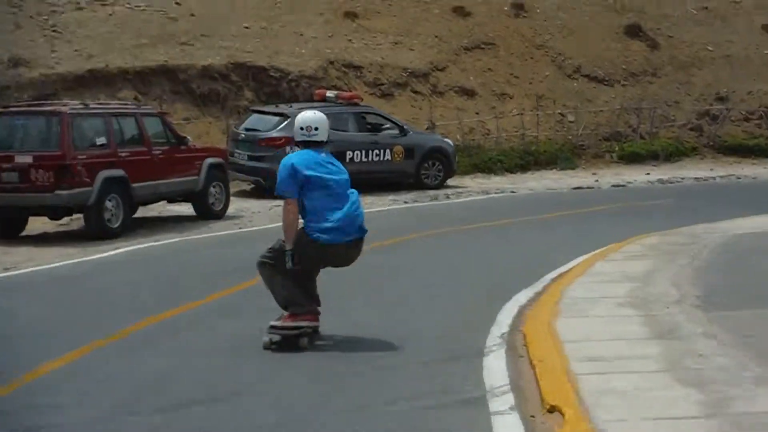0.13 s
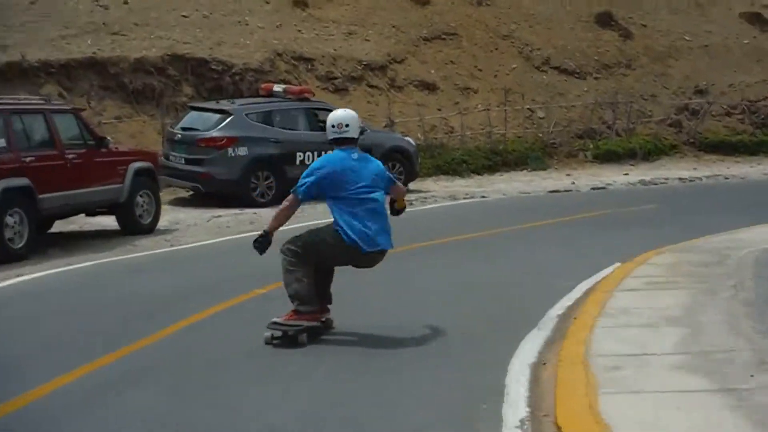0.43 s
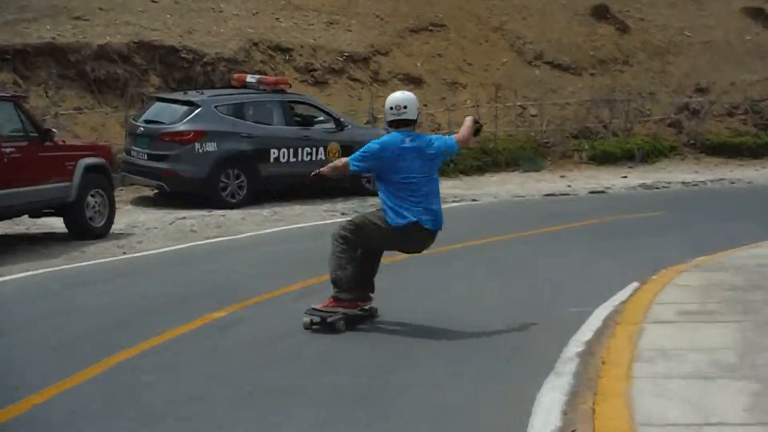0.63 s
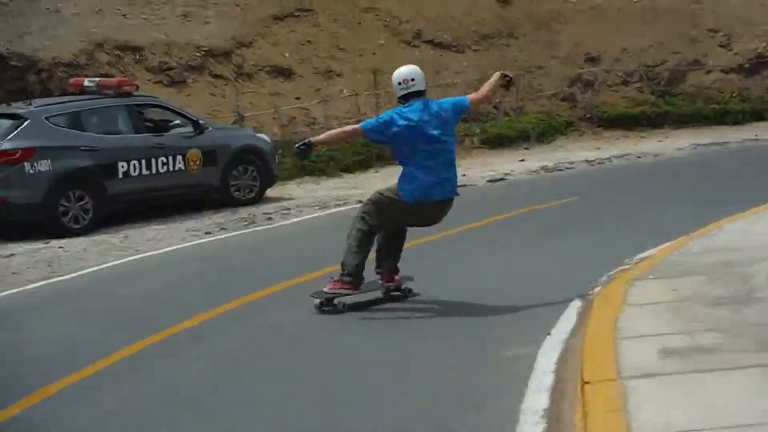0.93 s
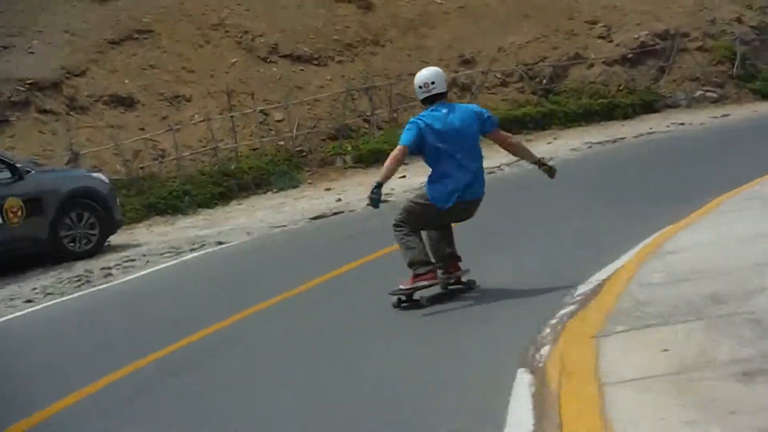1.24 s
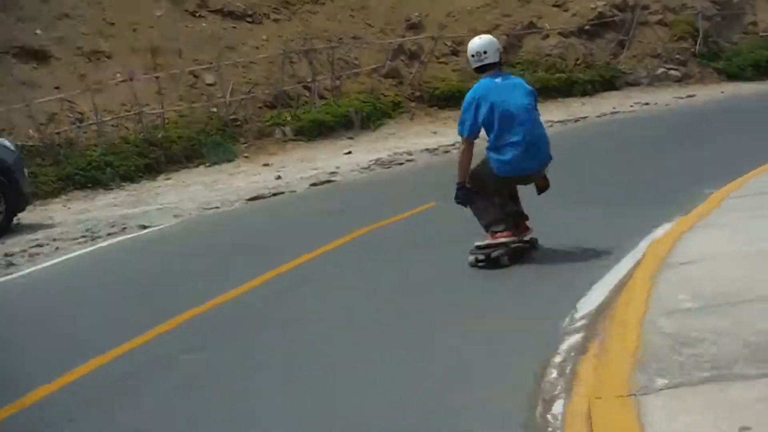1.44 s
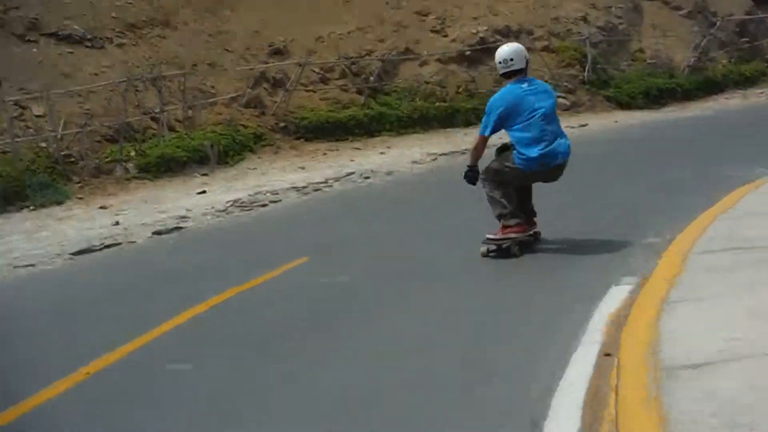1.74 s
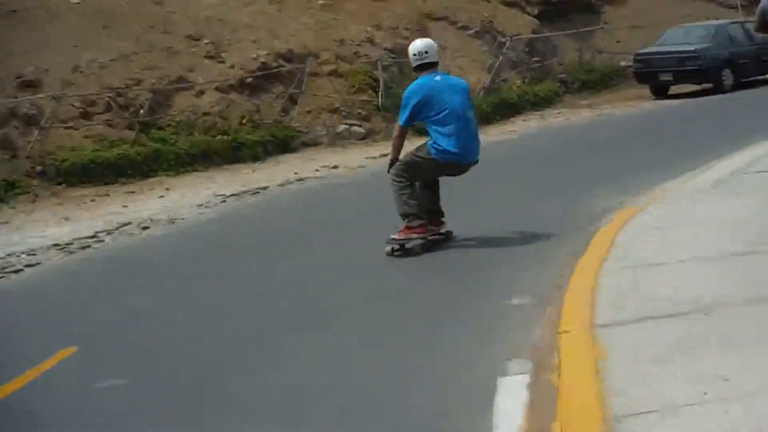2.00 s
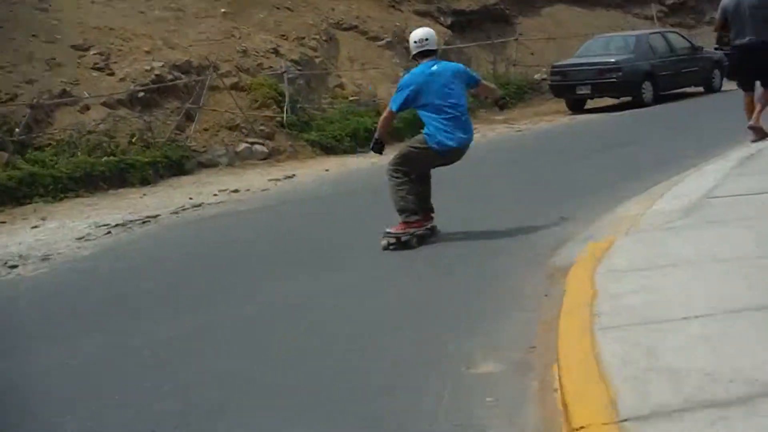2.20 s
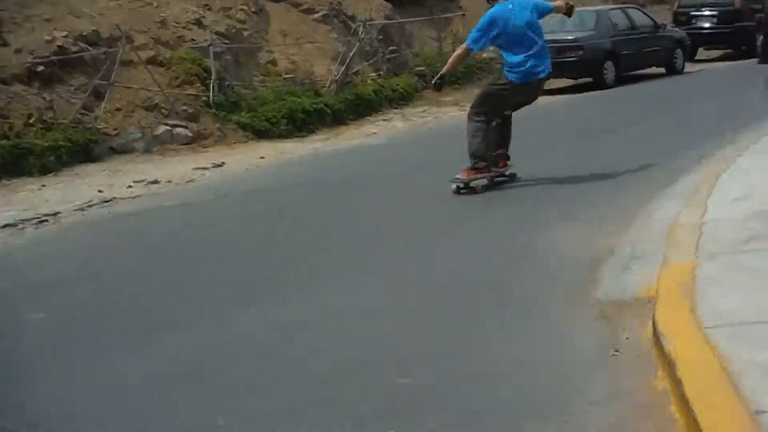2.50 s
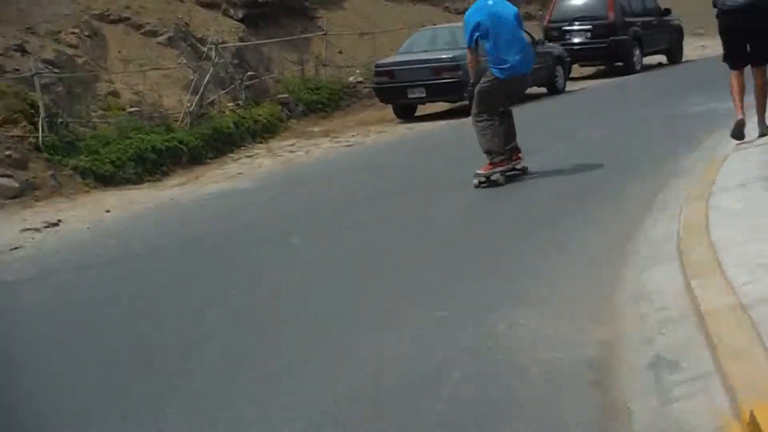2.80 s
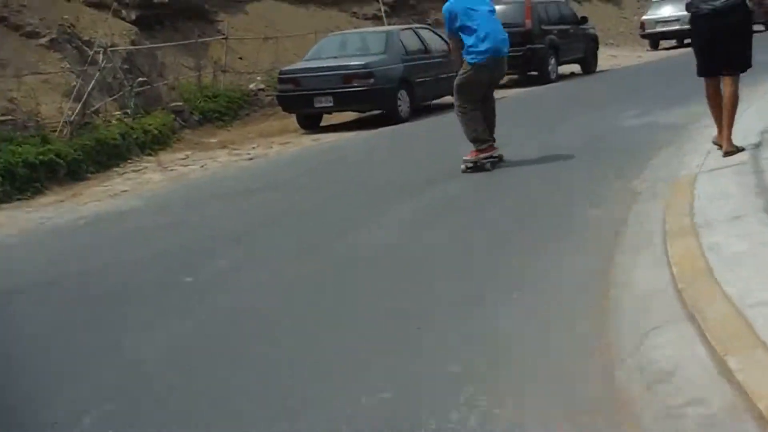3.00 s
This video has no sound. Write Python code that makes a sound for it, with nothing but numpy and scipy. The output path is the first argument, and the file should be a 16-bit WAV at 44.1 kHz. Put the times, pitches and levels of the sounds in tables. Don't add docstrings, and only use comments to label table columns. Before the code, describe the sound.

Skateboard wheels roll on gritty outdoor asphalt, a thin bright hiss around 5-6 kHz. Wind thumps and flutters from the start, overloading the close microphone hardest at 0.55-0.85 s. A scrape swells at 0.75-1.1 s with a sharp stone crack near 0.92, then quieter rolling and faint whistles. Rasping, squealing slides come at 1.87-2.2 and 2.24-2.6 s; rolling eases until an abrupt scrape at 3.06 s.

```python
import sys
import numpy as np
from scipy import signal
from scipy.fft import rfft, irfft
from scipy.io import wavfile
from scipy.ndimage import uniform_filter1d

SR = 44100
rng = np.random.default_rng(int(sys.argv[2]) if len(sys.argv) > 2 else 0)


def amp(db):
    return 10 ** (np.asarray(db, float) / 20)


def write(x):
    x = np.atleast_2d(x).T
    wavfile.write(sys.argv[1], SR, np.round(np.clip(x, -1, 1) * 32767).astype(np.int16))


N = 138915


def evened(x):
    return x / np.sqrt(np.mean(x ** 2) + 1e-20)


def curve(rows, column=1):
    rows = np.asarray(rows)
    return np.interp(np.arange(N) / SR, rows[:, 0], rows[:, column])


def colour(x, points):
    point_hz, point_db = np.transpose(points)
    hz = np.fft.rfftfreq(len(x), 1 / SR)
    level_db = np.interp(np.log(hz + 1), np.log(point_hz + 1), point_db, left=-80)
    return evened(irfft(rfft(x) * amp(level_db), len(x)))


def add(mix, start_s, sound):
    part = mix[max(round(start_s * SR), 0):][:len(sound)]
    part += sound[:len(part)]


def wander(lo_hz, hi_hz):
    t = np.arange(0, N + 64, 64) / SR
    rates_hz = np.geomspace(lo_hz, hi_hz, num=30)
    slow = sum(np.sin(2 * np.pi * (f * t + rng.random())) / f ** 0.17 for f in rates_hz)
    return np.interp(np.arange(N) / SR, t, evened(slow))


def resonate(x, hz, width_hz):
    turn = np.exp(2j * np.pi * np.cumsum(hz * np.ones(len(x))) / SR)
    r = np.exp(-np.pi * width_hz / SR)
    return evened((turn * signal.lfilter([1 - r], [1, -r], x / turn)).real)


def resonate_twice(x, hz, width_hz):
    return resonate(resonate(x, hz, width_hz), hz, width_hz)


# start_s, level_db
WIND_STRENGTH = [(0, -20), (.2, -22.5), (.45, -16), (.67, -20.5), (.8, -10.5), (.88, -21), (1.0, -27),
                 (1.65, -26), (1.92, -19), (2.1, -25), (2.3, -22.5), (3.04, -24), (3.08, -17)]
# hz, level_db
WIND_SPECTRUM = [(8, -7), (25, 0.5), (75, -3.5), (170, -9), (380, -21), (600, -25.5), (1500, -38.5),
                 (12000, -105)]


def wind_rumble():
    lumps_db = 1.5 * wander(5, 40)
    return colour(rng.standard_normal(N), WIND_SPECTRUM) * amp(curve(WIND_STRENGTH) + lumps_db)


# centre_s, peak_db, pitch_hz, length_s
THUMPS = [(0.004, -10, 73.3, 0.045), (0.095, -10.5, 79, 0.035), (0.205, -32, 87, 0.052),
          (0.308, -17, 57.4, 0.029), (0.346, -9, 43.3, 0.052), (0.396, -8.5, 53.3, 0.038),
          (0.419, -12.5, 68.2, 0.038), (0.464, -7, 74.3, 0.034), (0.497, -21, 47.7, 0.029),
          (0.55, -36, 40.6, 0.05), (0.645, -20, 57.4, 0.024), (0.694, -13.5, 81.3, 0.029),
          (0.716, -14, 40.6, 0.041), (0.846, -25, 50.5, 0.099), (0.917, -19.5, 66.3, 0.05),
          (1.235, -22.5, 89.6, 0.0354), (1.747, -20.5, 52, 0.061), (1.875, -23, 37, 0.074),
          (1.924, -14.5, 57.5, 0.059), (1.966, -11.5, 48.1, 0.0644), (2.137, -34, 54, 0.078),
          (2.25, -12.5, 66, 0.021), (2.301, -9.5, 74.6, 0.028), (2.323, -13, 52.3, 0.031),
          (2.431, -14.5, 65, 0.022), (2.62, -35, 49, 0.018), (2.686, -35, 53.4, 0.03),
          (2.774, -15, 48, 0.034), (3.13, -21, 53, 0.042)]


def thumps():
    out, kink = np.zeros(N), 0.95
    for (s, db, hz, length_s), (phase, bend, lean) in zip(THUMPS, rng.random((len(THUMPS), 3))):
        u = np.arange(0, 1, 1 / (max(length_s, .01) * SR))
        turns = hz * length_s * (u + .5 * (bend - .5) * u * u)
        a = 2 * np.pi * (turns + phase)
        crooked = kink * np.sin(a + 2 * np.pi * lean) + .5 * kink * np.sin(2.5 * a)
        swing = np.sin(a + crooked)
        add(out, s - length_s / 2, amp(db + 1) * np.sin(np.pi * u) * swing)
    return out


def grit():
    struck = rng.random(N) < 1900 / SR
    size = amp(2 * np.minimum(rng.exponential(1, N), 3)) * struck
    force = np.sqrt(abs(uniform_filter1d(size ** 2, size=12))) + 0.52
    hits = force * rng.standard_normal(N)
    return evened(hits * amp(0.64 * wander(12, 100)))


# start_s, level_db, ring_hz, road_coarseness_db
ROLL = [(0, -42, 6650, -1), (.6, -39, 5840, 1.5), (.93, -34.5, 5600, 5), (1.1, -31, 5930, -2),
        (1.18, -36.5, 5900, 0), (1.28, -34, 5600, -6), (1.45, -40, 5640, -1.5), (1.8, -40.5, 6300, -0.5),
        (1.9, -30, 6300, 1), (2.0, -23, 5970, 2.5), (2.21, -28, 5650, 2), (2.4, -24.5, 5880, 0),
        (2.58, -25, 5630, 3), (2.62, -27, 5840, 2.5), (2.78, -26.5, 5640, -0.5), (2.92, -31, 5560, 2),
        (3.04, -33.5, 5400, 0.5), (3.15, -39, 5200, -10)]
# hz, level_db
TREAD = [(410, -5), (700, -4), (1100, -5.5), (1630, -7), (2200, -8), (3800, -11), (5000, -6),
         (12200, -20.5), (15800, -36)]
# pitch_hz, width_hz, level_db
OVERTONES = [(7200, 900, -12.5), (8400, 260, -11.5)]


def rolling(stones):
    level_db, hz, coarse = curve(ROLL), curve(ROLL, 2), amp(curve(ROLL, 3))
    core = resonate(resonate(stones, hz, 870), hz, 560) * amp(0.6 * wander(8.8, 50))
    skirt = resonate(grit(), 1.14 * hz, 990)
    ring = evened(core + skirt)
    ring = ring + coarse * sum(amp(db) * resonate_twice(stones, f, w) for f, w, db in OVERTONES)
    ring = colour(ring, [(3500, -22), (5400, 13.5), (16000, -15.0)])

    tread = colour(grit(), TREAD)
    fizz = signal.lfilter(*signal.butter(2, 6500, "high", fs=SR), tread)
    tread = tread + (coarse - 1) * fizz
    tread_db = -37 + 0.27 * (level_db + 46.0)
    return amp(level_db - 0.5) * ring + amp(tread_db) * tread


# centre_s, peak_db, corner_hz
FLUTTERS = [(0.223, -19, 322), (0.236, -8, 398), (0.357, -11.5, 330.5), (0.376, -13, 374),
            (0.418, -10.5, 393), (0.445, -15, 325), (0.496, -12.5, 393), (0.578, -21, 314),
            (0.594, -11, 438), (0.615, -17, 330), (0.65, -13.5, 310), (0.674, -18, 320), (0.688, -7, 369),
            (0.707, -6, 494), (0.746, -8, 492), (0.756, -7.5, 450), (0.771, -2, 483), (0.783, -9.5, 450),
            (0.794, -6, 587), (0.812, -11, 393), (0.831, -8.5, 328), (0.836, -11.5, 472), (0.847, -10, 600),
            (0.899, -12, 482), (1.26, -25, 279), (1.918, -19, 333), (2.258, -19, 465), (2.282, -13.5, 329),
            (2.344, -13.5, 457), (2.775, -16.5, 381)]


def flutters():
    out, turns = np.zeros(N), 5
    f = np.fft.rfftfreq(4096, 1 / SR)
    low_cut = f ** 2 / (109 ** 2 + f ** 2)
    for (s, db, hz), air in zip(FLUTTERS, rng.standard_normal((len(FLUTTERS), 4096))):
        u = np.arange(0, 1, hz / (turns * SR))
        gain = low_cut * amp(-13 / 2 * np.log2(1 + (f / hz) ** 2))
        puff = irfft(rfft(air) * gain)[:len(u)]
        add(out, s - turns / hz / 2, amp(db - 3.5) * np.sin(np.pi * u) * evened(puff))
    return out


# centre_s, peak_db, half_width_s
PUSHES = [(.2212, -5, .0013), (.2305, -2, .001), (.242, -10, .0015), (.582, -4, .002), (.5875, 1, .004),
          (.5945, -8, .001), (.627, -4, .003), (.6998, -2, .0004), (.725, -11, .008), (.752, -5, .005),
          (.7725, -3, .001), (.779, -5, .002), (.797, -7, .004), (.8165, -4, .0015), (.824, -5, .003),
          (.9, -10, .001), (2.299, -10, .002), (2.433, -7, .003)]
# centre_s, peak_db, half_width_s
SUCKS = [(0.2167, -4.5, 0.001), (0.229, -6, 0.0037), (.2325, -9.5, 0.00055), (0.2346, -4, 0.0026),
         (.299, -8.5, .002), (.42, -3.5, .001), (.57, -7.5, 0.0031), (.578, -7, 0.0024),
         (0.6137, -3, 0.0012), (.619, -1, 0.0023), (.7009, -1, .0005), (.739, -3, 0.0047),
         (0.7626, -4, 0.0018), (0.768, 1, 0.0011), (0.789, -5, .002), (.81, -2.5, 0.0028),
         (0.898, -12.5, 0.00097), (1.2593, -5.5, 0.0016), (1.2679, -9.5, 0.00065), (1.276, -11.5, 0.0042),
         (2.777, -20, 0.0034), (2.921, -12, 0.00076)]


def eddies():
    t = np.arange(N) / SR
    return sum(sign * amp(db) * np.exp(-abs((t - s) / half_width_s) ** 1.98)
               for sign, rows in ((0.9, PUSHES), (-1.1, SUCKS)) for s, db, half_width_s in rows)


# start_s, level_db
SLIDES = [
    [(.72, -36), (.76, -29), (.88, -24), (.94, -22.5), (1.05, -26), (1.11, -28.5), (1.125, -35)],
    [(1.865, -38), (1.88, -29), (1.91, -21), (2.02, -25.5), (2.1, -30), (2.2, -29.5)],
    [(2.24, -33), (2.32, -24.5), (2.42, -20), (2.5, -22), (2.58, -29.5), (2.61, -30)],
    [(3.056, -49), (3.059, -18.5), (3.08, -21.5), (3.15, -21)],
]
# hz, level_db
SCRAPE_A = [(590, -34), (1000, -23), (1270, -25), (1400, -12), (1930, -3.5), (4020, -7), (5940, -2.5),
            (12000, -17), (15600, -30)]
SCRAPE_B = [(590, -40), (1000, -11), (1080, -3.5), (2370, -11), (2600, -4.5), (3930, -3.5), (7500, 0.5),
            (8100, -15), (15600, -26)]
SCRAPE_C = [(590, -39), (1000, -12), (2160, -11.5), (3710, -6), (4310, -11), (6200, 0.5), (7600, -8.5),
            (12700, -23), (15600, -41)]
SCRAPE_D = [(590, -25), (1000, -2), (2110, -17), (2510, -8), (4110, -10.5), (5670, 3), (7920, -12.5),
            (10800, -17), (15600, -37)]
# hz, level_db
DECK = [(200, -22), (350, 1), (560, 2), (1000, -7), (1500, -34)]
DECK_DB = (-12, -5, -10, -11.5)


def sliding():
    out, t = np.zeros(N), np.arange(N) / SR
    scrapes = (SCRAPE_A, SCRAPE_B, SCRAPE_C, SCRAPE_D)
    for rows, scrape, deck_db in zip(SLIDES, scrapes, DECK_DB):
        inside = (t > rows[0][0]) & (t <= rows[-1][0])
        stones = grit()
        tearing = colour(stones, scrape) + amp(deck_db) * colour(stones, DECK)
        out += inside * amp(curve(rows) - 2.5) * tearing
    return out


# pitch_hz, width_hz, level_db, start_s
WHINES = [
    (14900, 450, -69, .9),
    (13200, 600, -56, 2.8),
    (10500, 700, -54, 2.7),
]


def bearing_whines(stones):
    t = np.arange(N) / SR
    whines = sum(amp(db) * np.clip(10 * (t - s), 0, 1) * resonate_twice(stones, f, w)
                 for f, w, db, s in WHINES)
    return amp(2 * wander(1, 10)) * whines


# start_s, level_db, pitch_hz, width_hz
STONES = [
    (.918, -7.5, 5600, 800),
    (1.096, -20, 5700, 220),
    (1.237, -43, 5700, 13),
    (2.452, -17.5, 3620, 230),
]


def single_stones():
    out, t = np.zeros(N), np.arange(16000) / SR
    for s, db, hz, width_hz in STONES:
        shape = np.minimum(t * width_hz * 3, 1) * np.exp(-t * width_hz)
        tone = resonate(rng.standard_normal(len(t)), hz, 2 * width_hz + 180)
        add(out, s, amp(db) * shape * tone)
    return out


# start_s, peak_db, pitch_hz
SQUEALS = [(1.946, -16, 5450), (1.977, -14, 5470), (1.994, -11.5, 5710), (2.0188, -8, 5870),
           (2.0604, -19, 5900), (2.134, -8, 5600), (2.2644, -12.5, 5580), (2.3104, -9.5, 5630),
           (2.336, -15, 5750), (2.4026, -7.5, 5720), (2.4193, -6.5, 6280), (2.4579, -20, 5930),
           (2.4829, -10, 5590), (2.5395, -8, 5820), (2.5555, -7.5, 5680), (2.733, -12, 5660)]
# start_s, peak_db, pitch_hz
WHISTLES = [(1.09, -24, 5640), (1.24, -28, 5570), (1.275, -28, 5560), (1.301, -24.5, 5600),
            (1.35, -30, 5550), (1.377, -27, 5580), (1.465, -28, 5560)]
# start_s, peak_db, pitch_hz
UPPER_SQUEALS = [(1.8966, -26, 6820), (1.9405, -17, 7400), (2.0255, -17, 6970), (2.3328, -21, 6730),
                 (2.3712, -12, 6680), (2.4032, -16, 6790), (2.422, -15, 6890), (2.4567, -18, 6970)]
# level_db, length_s, width_hz
SQUEAL_KINDS = [(-9, 0.012, 350), (-5.5, .025, 120), (-7, 0.017, 340)]


def squeals():
    out, t = np.zeros(N), np.arange(3000) / SR
    rise = np.minimum(t / .006, 1)
    for rows, (kind_db, length_s, width_hz) in zip((SQUEALS, WHISTLES, UPPER_SQUEALS), SQUEAL_KINDS):
        shape = rise * np.exp(-(t / length_s) ** 2)
        for (s, db, hz), air in zip(rows, rng.standard_normal((len(rows), len(t)))):
            fuzz = resonate_twice(air, hz, 2 * width_hz)
            note = np.sin(2 * np.pi * hz * t) + 0.93 * fuzz
            add(out, s, amp(db + kind_db) * shape * note)
    return out


def scene():
    stones = grit()
    air = wind_rumble() + thumps() + flutters() + eddies()
    wheels = rolling(stones) + sliding() + bearing_whines(stones) + single_stones() + squeals()
    return (air + wheels)[None]


def low_pass(x):
    return signal.sosfilt(signal.butter(12, 15930, fs=SR, output="sos"), x)


def record(dry):
    clip, knee = .625, 14
    clipped = dry / (1 + abs(dry / clip) ** knee) ** (1 / knee)
    band_limit = signal.firwin(601, 15680, fs=SR)[None]
    return low_pass(signal.oaconvolve(clipped, band_limit, "same"))


dry = scene()
out = record(dry)
write(out)
```